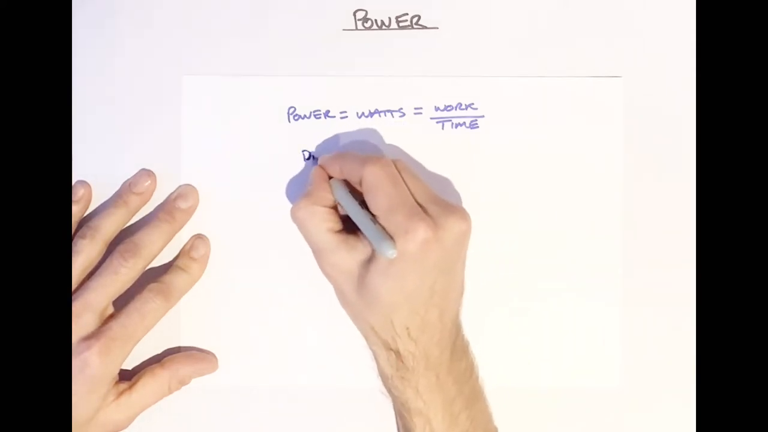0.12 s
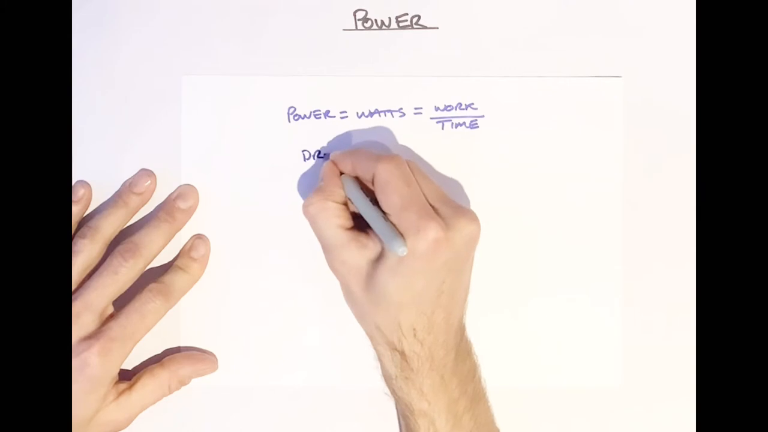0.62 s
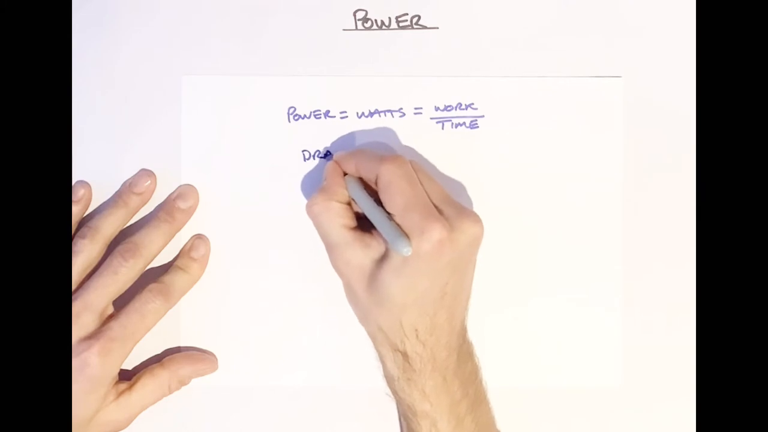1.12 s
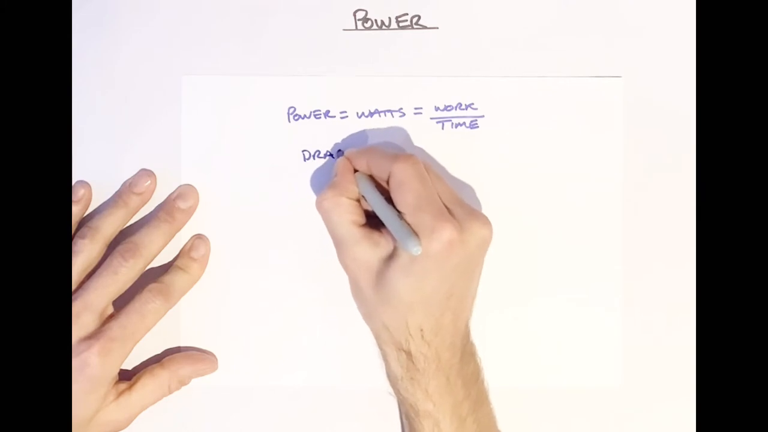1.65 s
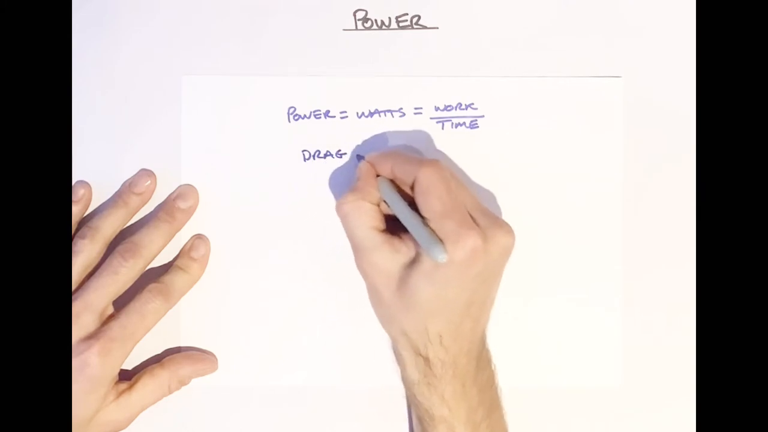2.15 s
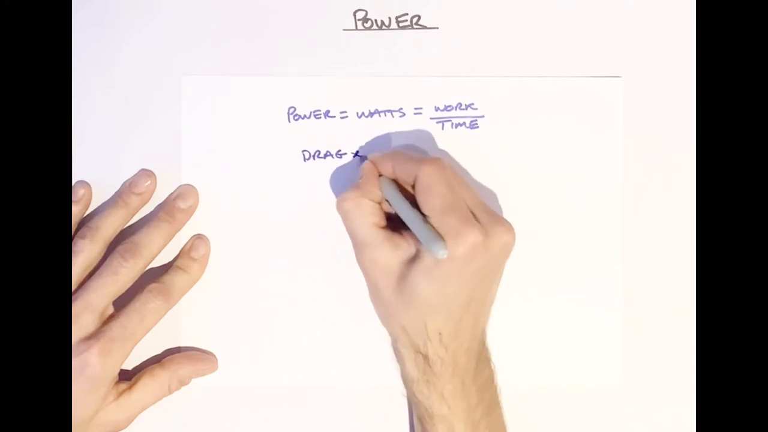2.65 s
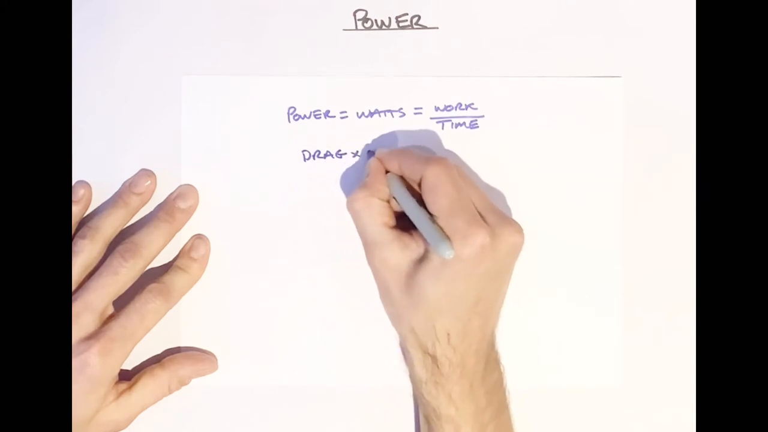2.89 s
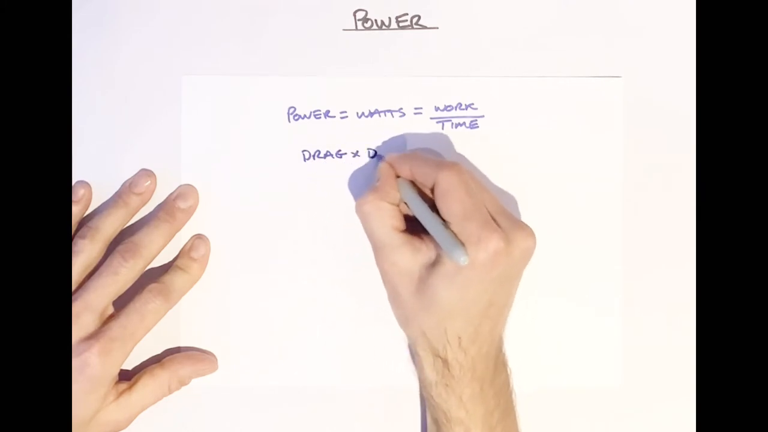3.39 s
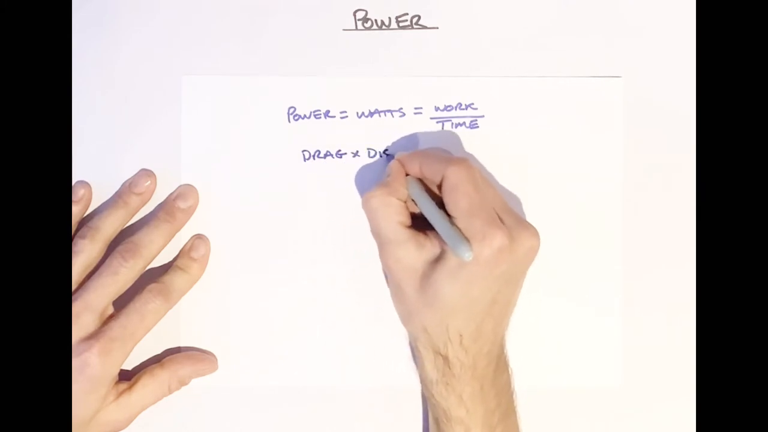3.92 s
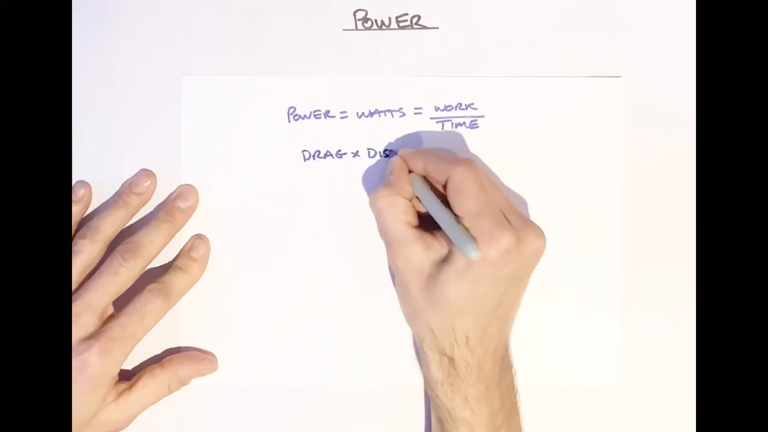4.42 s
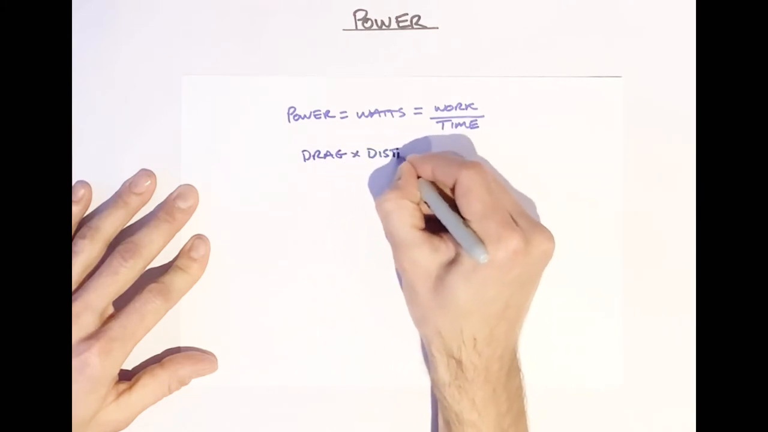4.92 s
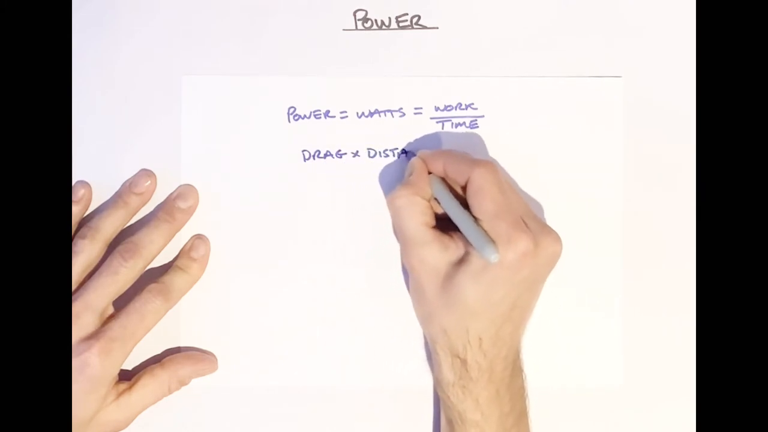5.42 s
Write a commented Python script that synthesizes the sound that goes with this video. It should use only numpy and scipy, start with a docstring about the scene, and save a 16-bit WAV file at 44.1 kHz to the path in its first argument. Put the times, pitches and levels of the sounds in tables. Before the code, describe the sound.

A felt-tip marker writes letters on paper up close, short dry scratchy strokes with soft taps and small hand slides over low desk rumble.

```python
"""Felt-tip marker on paper

Capital letters written on a sheet lying on a desk, close to the microphone, with slides of the hand between.
Strokes and slides are dense clicks of fibres on paper grain, which make the sheet hiss and pen and desk sound.
The tip lands softly as low-passed clicks into decaying desk modes; jolts of the hand are damped low sines.
Paper ticks are short noise puffs and spikes bare pulses, over noise-made sway, rumble and air, and a sine hum."""
import sys
import numpy as np
from scipy import signal
from scipy.fft import rfft, irfft
from scipy.io import wavfile
from scipy.ndimage import uniform_filter1d

SR = 44100
rng = np.random.default_rng(int(sys.argv[2]) if len(sys.argv) > 2 else 0)


def transcribe(u):
    """Save the signal u as a 16-bit wav file named by the first command-line argument.

    u: samples, shape (n,) or (channels, n), limited to [-1, 1]; the rate is SR.
    q: integer samples, one column per channel.
    """
    v = np.clip(np.atleast_2d(u).T, -1, 1)
    q = np.round(v * 32767).astype(np.int16)
    wavfile.write(sys.argv[1], SR, q)


def attenuation_scalar(level_db):
    """Turn a level in dB into a linear amplitude multiplier (20 dB per decade)."""
    decades = np.asarray(level_db, float) / 20
    return 10 ** decades


N = 244406

# low sway and rumble, noise with hand-drawn levels: time_s, slow_sway_db, rumble_db
SWAY_LEVELS = [(0.05, -31, -44), (0.9, -30, -41), (1.5, -33, -45), (1.92, -26, -44), (2.14, -23, -53),
               (2.52, -37, -36), (2.65, -28, -43), (3.9, -38, -38), (4.5, -21, -38), (4.69, -29, -48),
               (5.5, -27, -40)]
# spectrum of the quiet air, relative density: pitch_hz, level_db
AIR_SPECTRUM = [(24, -14.5), (40, -9), (64, -29), (109, -27.5), (281, -35), (343, -33), (726, -45),
                (1700, -50.5), (4180, -55), (6550, -54.5), (10800, -56), (15700, -59)]
# the hand jolts the desk, heights before smoothing: start_s, slow_rocking_height, quick_rocking_height
DESK_JOLTS = [(1.106, 0.043, 0.041), (1.922, 0.14, 0.04), (2.403, 0.082, 0.004), (2.504, 0.01, 0.034),
              (4.408, 0.056, 0.0069)]
# single sharp spikes: time_s, signed_height
SHARP_SPIKES = [(0.4289, -0.032), (4.39985, 0.12)]
# faint ticks of the paper, level at the start of the fade: start_s, level_db, pitch_hz
PAPER_TICKS = [(1.46, -61.5, 8000), (1.755, -61, 7000), (2.029, -64, 7860), (2.1, -63, 8500),
               (2.152, -58, 11500), (2.167, -64, 6000), (2.333, -60, 5600), (2.677, -59.5, 6800),
               (2.736, -58, 4500), (2.876, -62, 5500), (2.963, -64, 4500), (3.076, -56, 5000),
               (3.354, -66, 6500), (3.415, -65, 6000), (4.055, -65, 6000), (4.588, -65, 7000),
               (4.657, -67, 1520), (5.04, -59.5, 6060)]
# the tip lands, strength before the desk modes: start_s, level_db
TIP_LANDINGS = [(0.056, -57), (0.685, -57), (0.917, -53.5), (1.18, -63), (1.969, -57), (1.996, -56.5),
                (2.388, -53.5), (2.968, -58.5), (3.496, -56.5), (3.653, -51), (4.063, -49.5), (4.3, -46),
                (4.707, -59), (5.144, -56.5)]
# modes of the desk, t60 being the time to fall 60 dB: pitch_hz, relative_level_db, t60_s
DESK_MODES = [(110, -10, 0.082), (171.4, -4.5, 0.17), (202, -2.5, 0.08), (291, -10, 0.078), (351, 0, 0.17),
              (428.5, -8.5, 0.19), (550, -15, 0.14), (764, -19, 0.05)]
# strokes of the pen and slides of the hand over the paper, levels before the speed curve:
# start_s, speeding_up_s, steady_s, paper_hiss_db, body_db
STROKES_AND_SLIDES = [(0.031, 0.04, 0.05, -58, -60), (0.169, 0.036, 0.01, -55, -61.5),
                      (0.238, 0.058, 0.024, -64, -63), (0.496, 0.007, 0.026, -61, -63),
                      (0.583, 0.015, 0.031, -53, -56.5), (0.663, 0.05, 0.024, -60, -58),
                      (0.943, 0.031, 0.05, -66.5, -59.5), (1.09, 0.061, 0.001, -64, -75.5),
                      (1.177, 0.002, 0.1, -90, -70.5), (1.487, 0.016, 0.001, -58.5, -55.5),
                      (1.5, 0.023, 0.13, -65, -63.5), (1.692, 0.017, 0.014, -57.5, -52.5),
                      (1.781, 0.043, 0.035, -62.5, -58.5), (1.9, 0.018, 0.045, -57.5, -76),
                      (2.217, 0.014, 0.027, -51.5, -58.5), (2.279, 0.0022, 0.05, -77, -68),
                      (2.4, 0.053, 0.03, -64, -60), (2.514, 0.021, 0.053, -62, -81),
                      (2.788, 0.019, 0.012, -55.5, -57), (2.992, 0.03, 0.16, -64.5, -64),
                      (3.05, 0.07, 0.015, -54, -62.5), (3.131, 0.011, 0.016, -60, -58),
                      (3.224, 0.027, 0.016, -61.5, -76), (3.2, 0.03, 0.12, -75, -71.5),
                      (3.479, 0.018, 0.008, -58, -57), (3.672, 0.029, 0.002, -52, -52),
                      (3.739, 0.018, 0.038, -68, -67.5), (3.838, 0.015, 0.01, -51, -50),
                      (4.1, 0.026, 0.027, -63, -58), (4.24, 0.043, 0.07, -75, -68.5),
                      (4.338, 0.022, 0.017, -54.5, -55), (4.42, 0.078, 0.013, -57.5, -72),
                      (4.721, 0.022, 0.019, -60, -60), (4.827, 0.017, 0.032, -50.5, -53),
                      (4.91, 0.052, 0.026, -61.5, -56), (5.149, 0.031, 0.052, -63, -61.5),
                      (5.386, 0.027, 0.023, -62, -60), (5.493, 0.028, 0.08, -55.5, -50.5)]
# spectrum of the sheet's hiss, relative density: pitch_hz, level_db
HISS_SPECTRUM = [(1200, -24), (2500, -1.5), (3500, -7.5), (4500, -4), (5900, -6), (6600, 1.5), (9000, -3),
                 (12500, -1), (14500, -7), (15800, -6), (16500, 0)]
# resonances of the sheet, before each stroke's own gains: pitch_hz, width_hz, level_db
SHEET_MODES = [(3490, 62, -2.5), (6720, 67, -22.5), (7540, 83, -20.5), (9660, 33, -6), (11810, 55, -9),
               (13200, 48, -2)]
# pen barrel and desk top under a dragged tip, before each stroke's own gains: pitch_hz, width_hz, level_db
BODY_MODES = [(361, 18, 2.5), (445, 45, -4.5), (638, 106, -4), (809, 34, -3), (960, 78, -3),
              (1239.4, 46.6, 0.5), (1400, 110, -9), (1558, 80, -3), (1720, 96, -2), (2065, 123, -3),
              (2287, 183, -11), (2865, 100, -10), (2930, 41, -11.5)]

AIR_DB = -58.5
HUM_HZ, HUM_DB = 54, -57
HUM_FROM_S, HUM_TO_S = 3.3, 4.15   # full level between these
HUM_RISE_DB_PER_S, HUM_FALL_DB_PER_S = 100, 35
TICK_FADE_S = 0.004
FADE_S, FADE_PER_STEADY_S = 0.022, 0.2   # a long stroke also slows down gently
ONSET_POWER = 2.13   # steepness of the start
LINGER_DB, LINGER_S = -17, 0.07   # a faint tail outlasts the fade
MOVES_ON_S = 0.14   # half a turn of the stroke's changing colour
# body pitch favoured by the grip: high when the body sounds firmly, low when it is faint
FIRM_HZ, FAINT_HZ, HALFWAY_DB, CHANGE_OVER_DB = 1480, 880, -66.5, 2.5
RING_DB, RING_FADE_S = -13, 0.0036
TOP_HZ = 15980


def rms_one(x):
    """Scale to rms 1."""
    return x / np.sqrt(np.mean(x ** 2) + 1e-20)


def in_time(rows):
    """Columns of a curve, drawn straight between its points, at every sample."""
    s, *columns = np.transpose(rows)
    return [np.interp(np.arange(N) / SR, s, c) for c in columns]


def coloured(x, spectrum):
    """Give x a spectrum drawn through pitch_hz, level_db points; rms 1."""
    hz, db = np.transpose(spectrum)
    f = np.maximum(np.arange(N // 2 + 1) * SR / N, 1)
    gain_db = np.interp(np.log(f), np.log(hz), db, -80, -80)
    return rms_one(irfft(rfft(x) * attenuation_scalar(gain_db), N))


def band(x, low_hz, high_hz):
    """Band-pass; rms 1."""
    sos = signal.butter(2, [low_hz, high_hz], "band", fs=SR, output="sos")
    return rms_one(signal.sosfilt(sos, x))


def drift(rate_hz):
    """Slow chance: noise through a double low-pass, spread 1."""
    r = np.exp(-2 * np.pi * rate_hz / SR)
    noise = rng.standard_normal(N + SR)
    return rms_one(signal.lfilter([1], [1, -2 * r, r * r], noise)[SR:])


def resonances(x, table, extra_db):
    """Parallel damped resonances of alternating sign, each with some extra gain."""
    out = 0
    for k, (hz, width_hz, db) in enumerate(table):
        r = np.exp(-np.pi * width_hz / SR)
        a = [1, -2 * r * np.cos(2 * np.pi * hz / SR), r * r]
        out = out + (-1) ** k * attenuation_scalar(db + extra_db[k]) * signal.lfilter([1 - r, 0, r - 1], a, x)
    return out


def room():
    """Low sway and rumble of band-passed noise, a low hum that comes and goes, and the quiet air."""
    t = np.arange(N) / SR
    sway_db, rumble_db = in_time(SWAY_LEVELS)
    noise = rng.standard_normal((2, N + SR))   # the first second lets the filters settle
    sway = attenuation_scalar(sway_db) * band(noise[0], 2.267, 6.79)[SR:]
    rumble = attenuation_scalar(rumble_db) * band(band(noise[1], 8.9, 23.2), 8.0, 23.7)[SR:]
    rise_db = HUM_RISE_DB_PER_S * np.maximum(HUM_FROM_S - t, 0)
    fall_db = HUM_FALL_DB_PER_S * np.maximum(t - HUM_TO_S, 0)
    hum = np.sqrt(2) * attenuation_scalar(HUM_DB - rise_db - fall_db) * np.sin(2 * np.pi * HUM_HZ * t)
    air = attenuation_scalar(AIR_DB + 1.0 * drift(1.56)) * coloured(rng.standard_normal(N), AIR_SPECTRUM)
    return sway + rumble + hum + air


def jolts():
    """Each jolt sets the desk rocking in two damped low modes."""
    t, out = np.arange(N) / SR, 0
    for s, slow, quick in DESK_JOLTS:
        after = np.maximum(t - s, 0)
        out = out + slow * np.sin(2 * np.pi * 15 * after) * np.exp(-after / 0.061)
        out = out + quick * np.sin(2 * np.pi * 42 * after) * np.exp(-after / 0.038)
    return uniform_filter1d(out, size=260)


def spikes():
    """Bare bell-shaped pulses a few samples wide."""
    t, out = np.arange(N) / SR, np.zeros(N)
    for s, height in SHARP_SPIKES:
        out += height * np.exp(-((t - s) / 2.4e-5) ** 2 / 2)
    return out


def ticks():
    """Faint ticks of the paper: short fading puffs of noise around a pitch."""
    t, out = np.arange(N) / SR, np.zeros(N)
    white = rng.standard_normal(N)
    for s, db, hz in PAPER_TICKS:
        at = slice(int(s * SR), int(s * SR) + 1764)   # 40 ms
        puff = band(white[at], hz / 1.5, min(hz * 1.7, 16000))
        out[at] += attenuation_scalar(db) * puff * np.exp(-(t[at] - s) / TICK_FADE_S)
    return out


def landings():
    """A soft tip: a low-passed click into the damped desk modes, new strengths each time."""
    s, level_db = np.transpose(TIP_LANDINGS)
    luck_db, out = rng.normal(0, 1.64, (len(s), len(DESK_MODES))), 0
    for k, (hz, db, t60) in enumerate(DESK_MODES):
        clicks = np.full(N, 1e-18)
        clicks[(s * SR).astype(int)] = attenuation_scalar(level_db + db + 1.5 + luck_db[:, k])
        r, w = attenuation_scalar(-60 / (t60 * SR)), 2 * np.pi * hz / SR
        out = out + signal.lfilter([0, np.sin(w)], [1, -2 * r * np.cos(w), r * r], clicks)
    # two running means soften the clicks
    return uniform_filter1d(uniform_filter1d(out, size=30), size=30)


def fibres(per_s, spread_db):
    """Fibres catching on the paper grain: dense clicks of uneven size and either sign; rms 1."""
    sizes = attenuation_scalar(spread_db * np.minimum(rng.exponential(1, N), 5))
    signs = rng.choice([-1, 1], N)
    return rms_one(sizes * signs * (rng.random(N) < per_s / SR))


def speed_curve(since, rise, steady):
    """Curve of one stroke or slide: gathers speed, holds, then fades with a faint lingering tail."""
    gathering = np.sin(np.pi / 2 * np.clip(since / max(rise, 1e-3), 0, 1)) ** ONSET_POWER
    past = np.maximum(since - rise - steady, 0)
    fade = np.exp(-past / (FADE_S + FADE_PER_STEADY_S * steady))
    return gathering * np.maximum(fade, attenuation_scalar(LINGER_DB) * np.exp(-past / LINGER_S))


def strokes_and_slides():
    """The same catching fibres make the sheet hiss and drive the body; each movement has its own colour."""
    t, out = np.arange(N) / SR, np.zeros(N)
    grit = fibres(14000, spread_db=2.5) * attenuation_scalar(1.62 * drift(29.5))
    hiss = coloured(grit, HISS_SPECTRUM)
    broad = attenuation_scalar(-27.5) * band(grit, 337, 5100)
    ring_s = np.arange(1000) / SR
    octaves = np.log2(np.array(BODY_MODES)[:, 0])
    places, sheets = len(ring_s), len(SHEET_MODES)
    luck = rng.standard_normal((len(STROKES_AND_SLIDES), places + sheets + len(BODY_MODES)))
    for (s, rise, steady, hiss_db, body_db), draws in zip(STROKES_AND_SLIDES, luck):
        at = slice(int(s * SR), int((s + rise + steady + 0.25) * SR))
        since = t[at] - s
        place, sheet_luck, body_luck = np.split(draws, [places, places + sheets])
        # a sliding hand, with little body sound, hisses smoothly without the sheet ringing
        smoothing_db = 0.6 * min(body_db - hiss_db, 0)
        # the sheet's countless high modes: a short random ring that depends on the place on the sheet
        ring_fade = attenuation_scalar(RING_DB + smoothing_db) * np.exp(-ring_s / RING_FADE_S)
        ring = place * ring_fade
        # on its way the movement reaches another place, here the same draws reversed
        later = place[::-1] * ring_fade
        turn = np.pi * since / MOVES_ON_S
        sheet = hiss[at] + signal.fftconvolve(hiss[at] * np.cos(turn), ring)[:len(since)]
        sheet = sheet + signal.fftconvolve(hiss[at] * np.sin(turn), later)[:len(since)]
        sheet = sheet + attenuation_scalar(3 + smoothing_db) * resonances(sheet, SHEET_MODES, 4 * sheet_luck)
        # body modes weaken away from the favoured pitch, no further beyond an octave
        firmness = 1 / (1 + np.exp((HALFWAY_DB - body_db) / CHANGE_OVER_DB))
        favoured_hz = FAINT_HZ + (FIRM_HZ - FAINT_HZ) * firmness
        octaves_away = np.minimum(np.abs(octaves - np.log2(favoured_hz)), 1)
        grip_db = -5.0 * octaves_away + 2.8 * body_luck
        body = broad[at] + resonances(grit[at], BODY_MODES, grip_db)
        levelled = attenuation_scalar(hiss_db) * rms_one(sheet) + attenuation_scalar(body_db) * rms_one(body)
        out[at] += speed_curve(since, rise, steady) * levelled
    return out


def scene():
    """All sources, one channel."""
    return (room() + jolts() + spikes() + ticks() + landings() + strokes_and_slides())[None]


def band_limit(x):
    """A steep low-pass at the top of the band."""
    return signal.sosfilt(signal.butter(12, 16480, fs=SR, output="sos"), x)


def record(dry):
    """A steep low-pass cuts the top of the finished mix."""
    low_pass = signal.cheby2(14, 40, TOP_HZ, fs=SR, output="sos")
    mix = signal.sosfilt(low_pass, dry)
    return band_limit(mix)


dry = scene()
out = record(dry)
transcribe(out)
```